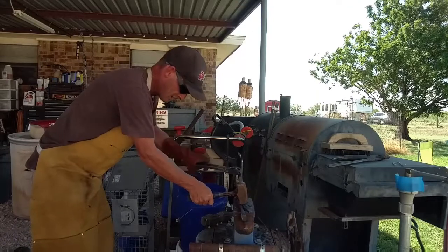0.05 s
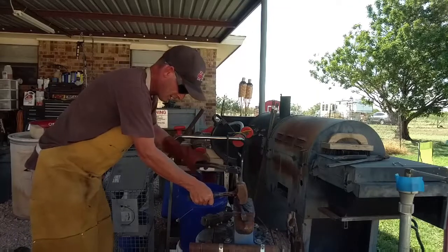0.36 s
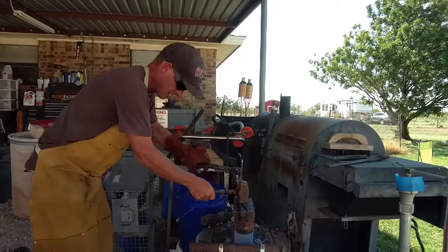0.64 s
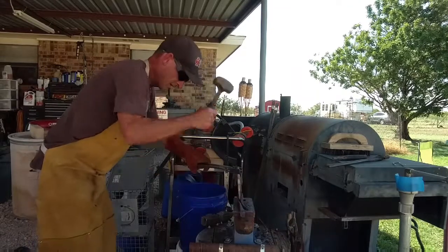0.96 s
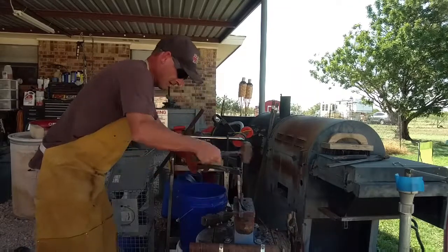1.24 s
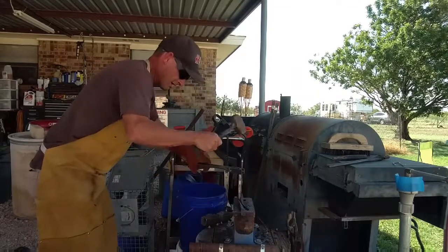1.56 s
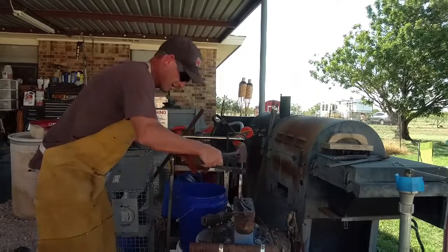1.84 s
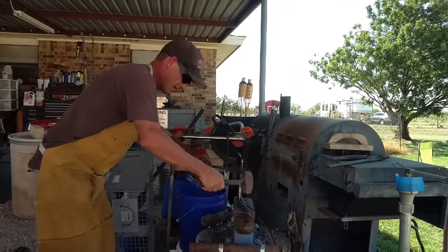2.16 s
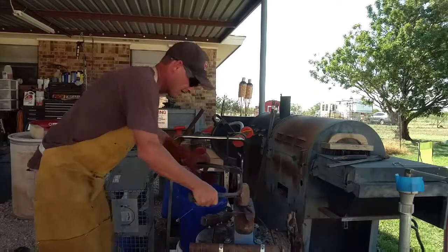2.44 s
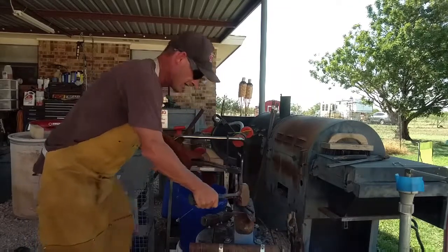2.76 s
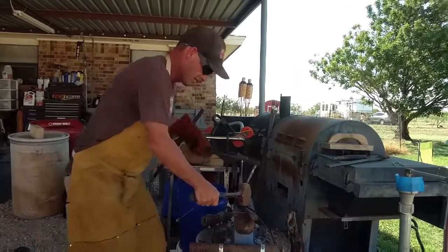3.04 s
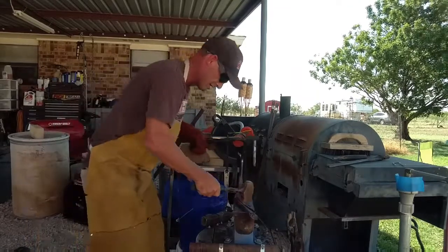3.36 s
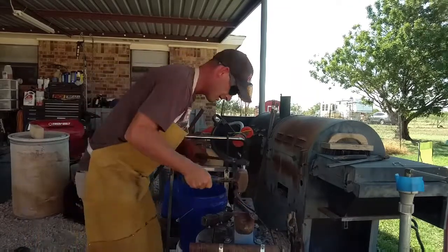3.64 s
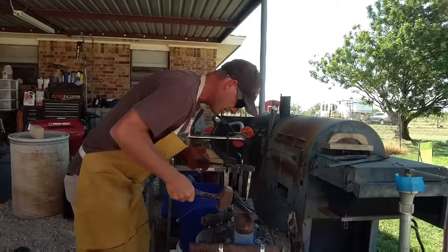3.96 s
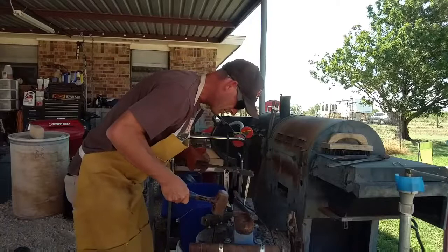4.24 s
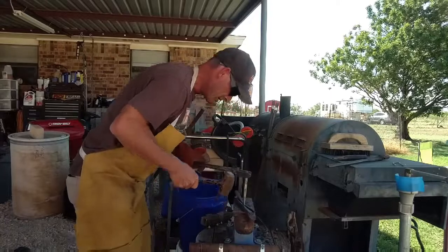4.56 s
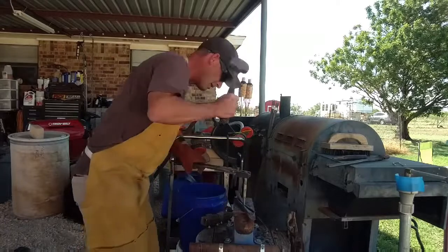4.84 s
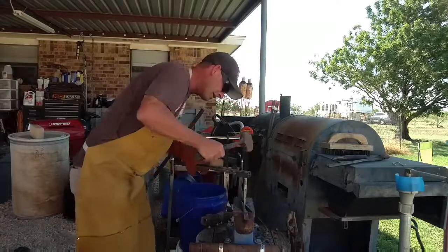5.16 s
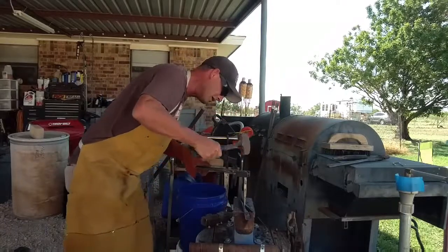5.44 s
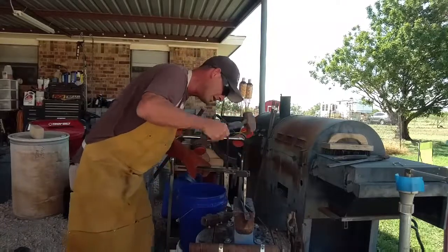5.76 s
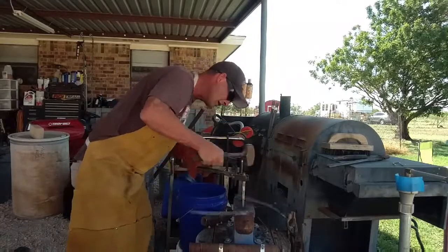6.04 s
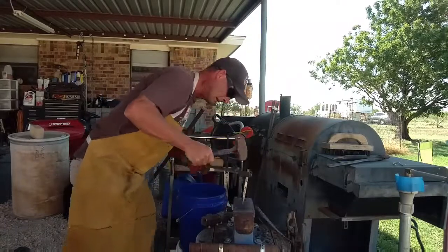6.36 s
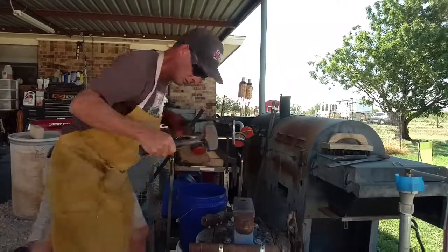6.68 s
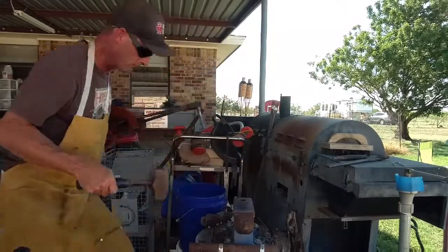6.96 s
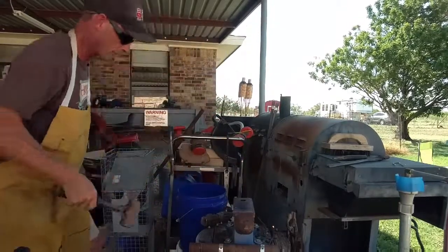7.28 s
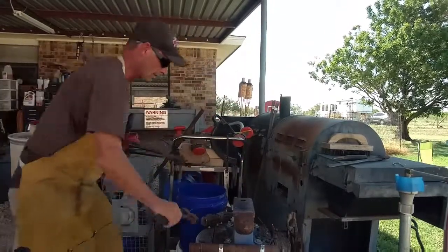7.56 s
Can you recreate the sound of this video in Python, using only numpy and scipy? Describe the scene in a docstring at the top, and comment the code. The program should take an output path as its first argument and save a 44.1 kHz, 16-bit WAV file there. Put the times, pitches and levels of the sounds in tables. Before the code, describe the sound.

A gas forge rumbles and hisses steadily in an open-sided shed while wind buffets the microphone. A hammer strikes a chisel on hot steel twice, sharp and close, with little ringing. Light taps, dull tool knocks and a small clink follow. Two more hard blows land, then steel scrapes, a heavy piece drops with a clunk and tools rattle to rest.

```python
"""A gas forge roars: flame rumble and jet hiss in a resonant chamber. Wind buffets the microphone.
Under an open tin roof a smith drives a chisel through hot steel on an anvil: four hard blows,
light taps between, the chisel's ring damped by the hot bar. Tools knock and tongs clink; then
boots scuff, steel scrapes and a heavy piece lands with a double clunk.
Gain control ducks on the hard blows and creeps back."""
import sys
import numpy as np
from scipy import signal
from scipy.fft import rfft, irfft
from scipy.io import wavfile
from scipy.ndimage import uniform_filter1d

SR = 44100
rng = np.random.default_rng(int(sys.argv[2]) if len(sys.argv) > 2 else 0)


def store_wav(level_fs):
    """Save 16-bit WAV to argv[1]."""
    pcm = np.round(np.clip(np.atleast_2d(level_fs), -1, 1) * 32767)
    wavfile.write(sys.argv[1], SR, pcm.T.astype(np.int16))


N = 335601
HIT_N = 16384
HIT_S, HIT_HZ, HZ = np.arange(HIT_N) / SR, np.fft.rfftfreq(HIT_N, 1 / SR), np.fft.rfftfreq(N, 1 / SR)

# Forge chamber resonances: f/Hz, width/Hz, gain/dB
CHAMBER_MODES = [(158.2, 26, 7.5), (276.1, 26, 9), (610.5, 48, 8), (754, 108, 7), (886, 32.6, 12),
                 (1304.7, 62, 12.5), (1576, 73, 7.5), (1705, 21, 10), (10970, 140, 4)]
# Flame and burner jet spectra: f/Hz, level/dB
FLAME_SPECTRUM = [(25, -51), (40, -33), (60, -20.5), (115, -12), (155, -5), (200, -9.5), (290, -11),
                  (330, -17), (400, -15.5), (500, -72), (900, -66), (2000, -92)]
JET_SPECTRUM = [(30, -35), (120, 8), (400, 0.5), (800, -3), (1000, -3), (1170, -9), (1500, -6.5),
                (2000, -10.5), (2600, -8.5), (3200, -16), (5000, -20.5), (6600, -25), (8000, -24.5),
                (11000, -29.5), (13000, -33), (16000, -38)]
# Flame and jet envelopes: t/s, level/dB
FLAME_ENVELOPE = [(.05, -28.5), (.38, -25), (.6, -29), (1.3, -29.5), (2.1, -29.5), (2.6, -27), (3.6, -25),
                  (3.96, -26.5), (4.02, -32.5), (4.13, -25.5), (4.9, -28.5), (5.08, -28), (5.35, -26.5),
                  (5.88, -25), (6.05, -29), (7, -25), (7.6, -28)]
JET_ENVELOPE = [(.5, -32), (.58, -35.5), (2, -35), (3.1, -33), (4.9, -35), (6.2, -31.5), (6.8, -30),
                (7.6, -35.5)]
# Wind on the microphone: f/Hz, level/dB
WIND_SPECTRUM = [(20, -41), (35, -15), (60, -15), (120, 3.5), (190, 0), (300, -9.5), (500, -22.5),
                 (1000, -60), (3000, -101)]
# Gusts: peak t/s, half length/s, level/dB
WIND_GUSTS = [(.15, 0.023, -23), (.54, 0.051, -18), (.75, 0.085, -20), (1.02, 0.2, -24.5),
              (1.98, 0.051, -16), (2.17, 0.062, -19), (2.82, 0.32, -32), (4.26, .04, -33),
              (4.93, 0.074, -26.5), (6.75, 0.53, -24.5), (7.32, 0.08, -10.5), (7.52, 0.1, -28)]

# Hard blows: t/s, level/dB, body/dB, fizz/dB, air/dB, lower resonance f/Hz, width/Hz, gain/dB,
# upper resonance f/Hz, gain/dB, chisel ring/dB, ring centre/Hz, pitch/ratio, head ring/dB, shed send/dB
HARD_BLOWS = [(1.1265, -1, -1.5, -1, -1, 3820, 1510, 7, 5700, 12.5, -20.5, 6130, 1.4, -46, -1.5),
              (1.6834, -8.5, -0.5, 0, -2, 4060, 720, 17, 5800, 18, -21, 5300, 1.0, -9, 1),
              (4.9487, 5.5, 1.5, 2, -2, 3620, 1000, 19, 6000, 9, -17, 3820, .99, -33, -3),
              (5.9505, 2.5, -3, 0.5, -1, 4600, 850, 16.5, 5730, 14.5, -12.5, 4060, 1.025, -20, -3)]
# Hammer-chisel contact: f/Hz, level/dB
STEEL_SPECTRUM = [(40, -41), (150, 4.5), (400, 3.5), (1100, 4), (1700, 4), (2400, 0), (3400, 0.5),
                  (7500, -1), (9500, -8.5), (12000, -11.5), (16000, -21)]
# Chisel damped by the hot bar; hammer head bouncing free: f/Hz, level/dB, t60/s
CHISEL_MODES = [(2260, 15, 0.33), (3460, -19, .15), (3580, -7, 0.18), (3680, -14, 0.12), (3900, -13, 0.2),
                (4130, -14, 0.17), (4300, -7, .14), (4570, 15, 0.21), (5650, 9, 0.21), (6100, -8, .16),
                (6250, 6, .16), (7140, -1, .14), (8400, -8, 0.13)]
HEAD_MODES = [(3850, 0, .46), (3973, -5, .3), (5800, -7, .22), (5970, -1, .38), (6487, -10, .22),
              (7246, -12, .2)]
# Taps: t/s, level/dB, body/dB, lower resonance f/Hz, upper resonance f/Hz, their gain/dB, contact/s
LIGHT_TAPS = [(2.1718, -31, 5, 3200, 6200, 11, 0.004), (2.1775, -27, 8, 3300, 5900, 10, 0.007),
              (2.1835, -28, 5, 3500, 6300, 10, 0.009), (2.966, -25, 10, 1700, 3500, 8, 0.01),
              (5.5555, -27.5, 6, 4000, 6340, 6, 0.002), (5.9965, -21, -3, 3900, 3880, 13, 0.006)]
# Tools put down: t/s, level/dB, centre f/Hz, contact/s
TOOL_KNOCKS = [(2.872, -21, 725, 0.027), (2.9578, -22, 1080, 0.0029), (2.973, -32, 1100, .004),
               (3.556, -26, 740, 0.027), (3.6677, -20, 1000, 0.001), (3.6748, -25, 1050, .001),
               (5.279, -30, 895, 0.0015), (6.49, -28, 1200, 0.0048), (6.522, -19, 1110, 0.0014),
               (6.574, -23, 1010, 0.0024), (6.578, -24, 790, 0.0027), (6.602, -20.5, 1300, .008),
               (6.624, -28, 1100, 0.0062), (6.642, -28, 1100, .006), (6.71, -40, 1100, 0.0038),
               (6.85, -35, 1100, .003), (6.885, -21, 870, 0.0036), (6.927, -36, 1000, 0.0042),
               (6.959, -40, 1000, 0.0035)]
# Tongs on the anvil: t/s, level/dB
TONG_CLINKS = [(2.965, -29)]
# Ring of the tongs: f/Hz, level/dB, t60/s
TONG_MODES = [(2285, -1, .09), (3333, 0, .075), (5950, -16, .06)]
# Steel and boots scuffing: t/s, level/dB, contact/s
SHORT_SCUFFS = [(6.069, -23, 0.018), (6.21, -21, 0.0084), (6.246, -19, 0.005), (6.272, -22.5, 0.016),
                (6.344, -27, 0.0078), (6.574, -19.5, 0.01)]
# Steel dragged over steel: peak t/s, half length/s, level/dB
SCRAPE_STROKES = [(6.285, 0.046, -28.5), (6.615, 0.056, -29), (6.87, 0.08, -35.5)]
# One slip of a scrape: f/Hz, level/dB
SLIP_SPECTRUM = [(100, -46), (450, 4.5), (700, -1.5), (1100, -3.5), (1550, 1), (2000, -22), (3500, -13),
                 (7000, -18.5), (16000, -36)]
# Steel touching steel: t/s, level/dB, contact/s
STEEL_TICKS = [(6.3848, -27, .002), (6.4735, -34, 0.0015), (6.571, -36, .002), (6.739, -34, 0.028),
               (6.862, -42, .003)]
# Heavy steel landing: t/s, level/dB
CLUNK_LANDINGS = [(6.3961, -2.5), (6.4005, -7)]
# Its contact: f/Hz, level/dB
CLUNK_SPECTRUM = [(60, -41), (250, -3), (480, -17.5), (680, 0), (1000, -3), (1550, 5), (2000, -8.5),
                  (2600, -4), (3300, -5), (4400, -12), (5000, -17), (6100, -15), (7500, -25), (16000, -40)]
# Its ring: f/Hz, level/dB, t60/s
HEAVY_MODES = [(1160, -8, 0.035), (1440, -3, 0.03), (1610, 6, 0.026), (2030, -9, 0.05), (3230, -11, .05),
               (4280, -9, 0.05)]

# Decay off nearby machines and floor (early), roof and walls (late): f/Hz, t60/s
EARLY_DECAY = [(150, 0.23), (1000, 0.12), (4000, 0.13), (8000, 0.13), (16000, 0.18)]
LATE_DECAY = [(150, 0.56), (1000, 0.49), (4000, 0.48), (8000, 0.4), (16000, 0.42)]
# Shed echoes: delay/s, level/dB
SHED_ECHOES = [(0.0485, -19.5), (.132, -34.5)]
# Left-right likeness of the forge and of the anvil work: f/Hz, likeness/0-1
FORGE_LIKENESS = [(50, 0.44), (150, 1), (280, 1), (450, 0.85), (600, 0.93), (1200, 0.98), (1700, 0.99),
                  (2500, 0.98), (4000, 0.81), (7000, 0.55), (10000, 0.7), (13000, 0.4)]
WORK_LIKENESS = [(100, 0.4), (400, 0.9), (1200, 1), (2600, 0.83), (4000, 0.72), (5000, 0.76), (6300, 0.45),
                 (8000, 0.75), (12000, 0.6)]

UPPER_WIDTH_HZ = 530  # upper resonance of blows and taps


def amp(db):
    """Decibels to gain."""
    return 10 ** (np.asarray(db) / 20)


def unit_rms(x):
    """Scale to rms 1."""
    return x / np.sqrt(np.mean(x ** 2) + 1e-20)


def unit_energy(x):
    """Scale each channel to energy 1."""
    return x / np.sqrt(np.sum(x ** 2, -1, keepdims=True) + 1e-20)


def at_hz(table, hz):
    """Interpolate a table over log frequency."""
    table_hz, value = np.transpose(table)
    return np.interp(np.log(hz + 1), np.log(table_hz + 1), value)


def curve(table):
    """Interpolate a time table at every sample."""
    return np.interp(np.arange(N) / SR, *np.transpose(table))


def hump(hz, centre_hz, width_hz):
    """Resonance bell, peak 1."""
    return 1 / (1 + (2 * (hz - centre_hz) / width_hz) ** 2)


def add(mix, start_s, sound):
    """Mix in a stereo sound."""
    part = mix[:, round(start_s * SR):][:, :sound.shape[1]]
    part += sound[:, :part.shape[1]]


def likeness(table, hz, comb_hz=2550, steepness=0.39):
    """Correlation of the two microphone ports; treble is out of phase at multiples of comb_hz."""
    swing = np.tanh(-steepness * np.cos(2 * np.pi * hz / comb_hz)) / np.tanh(steepness)
    return at_hz(table, hz) * np.where(hz > comb_hz / 2, swing, 1)


def pair(a, b, alike):
    """Stereo of given correlation from two independent signals."""
    alike = np.clip(alike, -1, 1)
    shared, opposed = np.sqrt((1 + alike) / 2) * a, np.sqrt((1 - alike) / 2) * b
    return np.array([shared + opposed, shared - opposed])


def noise(colour_db, alike):
    """Steady coloured stereo noise, rms 1."""
    a, b = rfft(rng.standard_normal((2, N)))
    return unit_rms(irfft(pair(a, b, alike) * amp(colour_db), N))


def flutter(rate_hz=12.3):
    """Slow random wander, rms 1."""
    return unit_rms(irfft(rfft(rng.standard_normal(N)) * (HZ > 1) / (1 + (HZ / rate_hz) ** 4), N))


def swells(table):
    """Gain of bell-shaped swells; powers add."""
    t = np.arange(N) / SR
    powers = (amp(db) ** 2 / (1 + ((t - peak_s) / half_s) ** 2 / 2) ** 4 for peak_s, half_s, db in table)
    return np.sqrt(sum(powers))


def causal(colour_db):
    """Minimum-phase spectrum of a given colour."""
    log_gain = np.log(amp(np.concatenate([colour_db, colour_db[-2:0:-1]])))
    return np.exp(np.conj(signal.hilbert(log_gain)))[:len(HIT_HZ)]


def forge(flutter_db=1.26):
    """Fluttering flame and hissing jet, both coloured by the chamber's resonances."""
    chamber_db = sum(db * hump(HZ, hz, width_hz) for hz, width_hz, db in CHAMBER_MODES)
    alike = likeness(FORGE_LIKENESS, HZ)
    flame = noise(at_hz(FLAME_SPECTRUM, HZ) + chamber_db, alike)
    flame *= amp(curve(FLAME_ENVELOPE) + flutter_db * flutter())
    jet = noise(at_hz(JET_SPECTRUM, HZ) + chamber_db, alike) * amp(curve(JET_ENVELOPE))
    shade_db = 5 * hump(HZ, 1720, width_hz=280)  # housing shades the left port: this band leans right
    return flame + irfft(rfft(jet) * amp([-shade_db, shade_db]), N)


def wind(breeze_db=-35.5, flutter_db=6.5):
    """Breeze and gusts buffet the two ports, mostly in antiphase."""
    strength = np.hypot(amp(breeze_db + flutter_db * flutter()), swells(WIND_GUSTS))
    return noise(at_hz(WIND_SPECTRUM, HZ), alike=-0.85) * strength * amp([[-0.8], [0.8]])


def contact(colour_db, contact_s):
    """Brief chatter of two surfaces, filtered by the struck body."""
    chatter = rfft(rng.standard_normal(HIT_N) * np.exp(-(HIT_S / max(contact_s, 1e-4)) ** 2))
    whitened = chatter / np.sqrt(uniform_filter1d(abs(chatter) ** 2, size=300) + 1e-12)
    return unit_energy(irfft(whitened * causal(colour_db)) * (HIT_S < HIT_S[-1] / 2))


def ring(modes, waver_hz=45, waver_depth=0.95):
    """Decaying steel modes; each wavers as it arrives by many paths."""
    out = 0
    for hz, db, t60_s in modes:
        white = rfft(rng.standard_normal((2, HIT_N)))
        a, b = unit_rms(irfft(white / (1 + (HIT_HZ / waver_hz) ** 2)))
        waver = 1 + waver_depth * (a + 1j * b) * (1 - np.exp(-HIT_S * waver_hz * 2))
        tone = (waver * np.exp(2j * np.pi * hz * HIT_S)).imag
        out = out + amp(db) * np.exp(-np.log(1000) * HIT_S / t60_s) * tone
    return unit_energy(out)


def chisel_ring(centre_hz, pitch=1, falloff_db_per_oct=16):
    """The strike point favours modes near centre_hz; seating depth shifts their pitch."""
    modes = [(hz * pitch, db - falloff_db_per_oct * abs(np.log2(hz / centre_hz)), t60_s)
             for hz, db, t60_s in CHISEL_MODES]
    return ring(modes, waver_hz=120)  # rough: the chisel grinds in the bar


def steel_colour(body_db, fizz_db=0, air_db=0):
    """Chisel contact spectrum in dB: body below 2 kHz, fizz above 7 kHz, air above 12.5 kHz."""
    body = 1 / (1 + (HIT_HZ / 2000) ** 4)
    fizz = 1 - 1 / (1 + (HIT_HZ / 7000) ** 6)
    air = 1 - 1 / (1 + (HIT_HZ / 12500) ** 16)
    return at_hz(STEEL_SPECTRUM, HIT_HZ) + body_db * body + fizz_db * fizz + air_db * air


def strike(db, steel_db, seat_db, ringing, contact_s, send_db=0):
    """Crack deadened by the soft hot bar, coloured by the chisel's seat, plus the ring."""
    # Resonances beam forward; the sound spreading round the shed is plainer and fuller.
    body_cut_db = 2 / (1 + (HIT_HZ / 3000) ** 4)
    direct = contact(steel_db + seat_db - body_cut_db, contact_s) + ringing
    outward = unit_energy(irfft(causal(steel_db + 0.31 * seat_db))) + amp(-6) * ringing
    return shed(direct, amp(send_db) * outward, db, early_db=2, late_db=-14)


def ports(sound, smear_s=0.0008):
    """Near sound at the two ports: part shared, part opposed and smeared."""
    alike = np.clip(likeness(WORK_LIKENESS, HIT_HZ), -0.99, 0.99)
    smear = rfft(contact(np.zeros_like(HIT_HZ), smear_s))
    shared = irfft(rfft(sound) * causal(10 * np.log10((1 + alike) / 2)))
    opposed = irfft(rfft(sound) * causal(10 * np.log10((1 - alike) / 2)) * smear)
    return np.array([shared + opposed, shared - opposed])


def scatter(decay, rise_s):
    """Diffuse stereo tail with a t60 per band."""
    hz, t, (a, b) = signal.stft(rng.standard_normal((2, HIT_N)), SR, nperseg=256)
    bands = pair(a, b, likeness(WORK_LIKENESS, hz)[:, None])
    bands *= np.exp(-np.log(1000) * t / at_hz(decay, hz)[:, None])
    tail = signal.istft(bands, SR, nperseg=256)[1][:, :HIT_N]
    return unit_energy(tail * (1 - np.exp(-(HIT_S / rise_s) ** 2)))


def shed(direct, outward, level_db, early_db, late_db):
    """Direct sound plus scatter and echoes of the outward sound; level is rms if packed into 10 ms."""
    response = amp(early_db) * scatter(EARLY_DECAY, rise_s=0.0016)
    response += amp(late_db) * scatter(LATE_DECAY, rise_s=0.025)
    for delay_s, db in SHED_ECHOES:
        echo = unit_energy(rng.standard_normal((2, HIT_N)) * np.exp(-HIT_S / 0.0079))
        add(response, delay_s, amp(db + early_db) * echo)
    heard = signal.fftconvolve(outward[None], response, axes=1)
    add(heard, 0, ports(direct))
    return amp(level_db) * unit_energy(heard) * np.sqrt(SR * 0.01)


def blows(contact_s=0.0012):
    """Hard hammer blows: brief, bright contacts that ring the chisel and hammer head."""
    out = np.zeros((2, N))
    for (start_s, db, body_db, fizz_db, air_db, low_hz, width_hz, low_db, high_hz, high_db,
         ring_db, ring_hz, pitch, head_db, send_db) in HARD_BLOWS:
        steel_db = steel_colour(body_db, fizz_db, air_db)
        seat_db = low_db * hump(HIT_HZ, low_hz, width_hz)
        seat_db += high_db * hump(HIT_HZ, high_hz, UPPER_WIDTH_HZ)
        ringing = amp(ring_db) * chisel_ring(ring_hz, pitch) + amp(head_db) * ring(HEAD_MODES)
        add(out, start_s, strike(db, steel_db, seat_db, ringing, contact_s, send_db))
    return out


def taps(ring_db=-22, lower_width_hz=1900):
    """Tools seated or hammer rebounding: longer chatter, more body."""
    out = np.zeros((2, N))
    for start_s, db, body_db, low_hz, high_hz, peak_db, contact_s in LIGHT_TAPS:
        seat = hump(HIT_HZ, low_hz, lower_width_hz) + hump(HIT_HZ, high_hz, UPPER_WIDTH_HZ)
        ringing = amp(ring_db) * chisel_ring(high_hz)
        add(out, start_s, strike(db, steel_colour(body_db), peak_db * seat, ringing, contact_s))
    return out


def bump(db, contact_s, centre_hz, width_oct, grit_db):
    """Contact without ring: one broad resonance and a shelf of grit."""
    body = np.exp(-0.5 * (np.log2((HIT_HZ + 1) / centre_hz) / width_oct) ** 2)
    grit = amp(grit_db) * (HIT_HZ + 1) / (HIT_HZ + 300) / (1 + (HIT_HZ / 6500) ** 2)
    sound = contact(20 * np.log10(body + grit), contact_s)
    return shed(sound, sound, db, early_db=3, late_db=-9)


def knocks():
    """Tools put down knock dully and rattle to rest."""
    out = np.zeros((2, N))
    for start_s, db, centre_hz, contact_s in TOOL_KNOCKS:
        grit_db = -28.5 - np.log10(contact_s / 0.0018)  # 1 dB less per tenfold contact time
        add(out, start_s, bump(db, contact_s, centre_hz, width_oct=0.52, grit_db=grit_db))
    return out


def tongs():
    """Tongs touch the anvil and ring briefly."""
    out = np.zeros((2, N))
    for start_s, db in TONG_CLINKS:
        clink = ring(TONG_MODES)
        add(out, start_s, shed(clink, clink, db, early_db=-8, late_db=-18))
    return out


def scuffs():
    """Steel and boots rub in short midrange bursts."""
    out = np.zeros((2, N))
    for start_s, db, contact_s in SHORT_SCUFFS:
        add(out, start_s, bump(db, contact_s, centre_hz=1180, width_oct=0.93, grit_db=-25))
    return out


def scrapes(slips_per_s=170):
    """Sliding tools: many uneven slips ring the same steel as the clunk."""
    slips = rng.exponential(1, N).clip(0, 2.5) * (rng.random(N) < slips_per_s / SR)
    slip = contact(at_hz(SLIP_SPECTRUM, HIT_HZ), contact_s=0.00051) + amp(-21) * ring(HEAVY_MODES)
    slip_in_shed = shed(slip, slip, 0, early_db=10.5, late_db=-5)
    rattle = signal.oaconvolve(slips[None], slip_in_shed, axes=1)[:, :N]
    return unit_rms(rattle) * swells(SCRAPE_STROKES)


def ticks():
    """Steel touches steel: small bright contacts."""
    out = np.zeros((2, N))
    for start_s, db, contact_s in STEEL_TICKS:
        add(out, start_s, bump(db, contact_s, centre_hz=7300, width_oct=0.47, grit_db=-1))
    return out


def clunk(ring_db=2.5):
    """Heavy steel lands on one edge, then flat, and rings briefly."""
    out = np.zeros((2, N))
    for start_s, db in CLUNK_LANDINGS:
        thud = contact(at_hz(CLUNK_SPECTRUM, HIT_HZ), contact_s=0.0018)
        direct = thud + amp(ring_db) * ring(HEAVY_MODES)
        add(out, start_s, shed(direct, thud, db, early_db=1, late_db=-9.5))
    return out


def scene():
    """Forge, wind and the work at the anvil, slightly right; small steel radiates no deep bass."""
    work = blows() + taps() + knocks() + scuffs() + ticks() + tongs() + clunk() + scrapes()
    work = signal.sosfilt(signal.butter(2, 110, "high", fs=SR, output="sos"), work)
    return forge() + wind() + work * amp([[-0.9], [0.9]])


def record(dry, threshold_db=-16.5, cut_db_per_db=0.78, recovery_db_per_s=7, cutoff_hz=16200):
    """Gain control drops at once on treble peaks and creeps back; then soft overload and low-pass."""
    treble = signal.sosfilt(signal.butter(2, 2000, "high", fs=SR, output="sos"), dry)
    power_db = 10 * np.log10(abs(uniform_filter1d((treble ** 2).mean(0), size=300)) + 1e-12)
    cut_db = cut_db_per_db * np.maximum(power_db - threshold_db, 0)
    recovery_db = recovery_db_per_s * np.arange(N) / SR
    held_db = np.maximum.accumulate(cut_db + recovery_db) - recovery_db
    ducked = dry * amp(-uniform_filter1d(held_db, size=100))
    limited = ducked / (1 + ducked ** 6) ** (1 / 6)
    lowpass = signal.firwin(301, cutoff_hz, window=("kaiser", 9), fs=SR)
    return signal.oaconvolve(limited, lowpass[None], "same")


dry = scene()
out = record(dry)
store_wav(out)
```